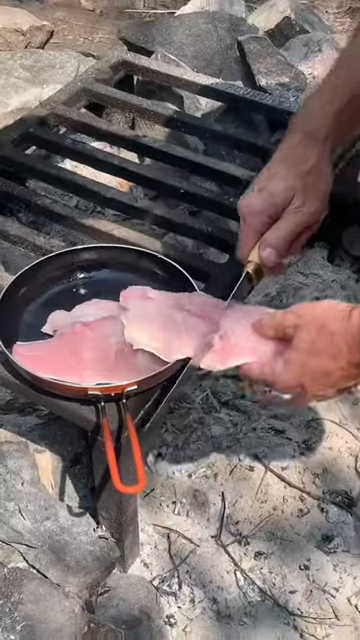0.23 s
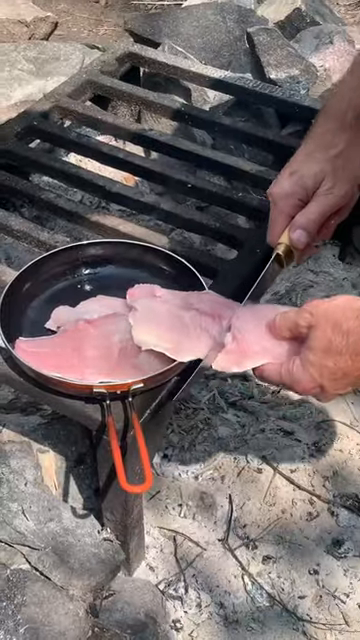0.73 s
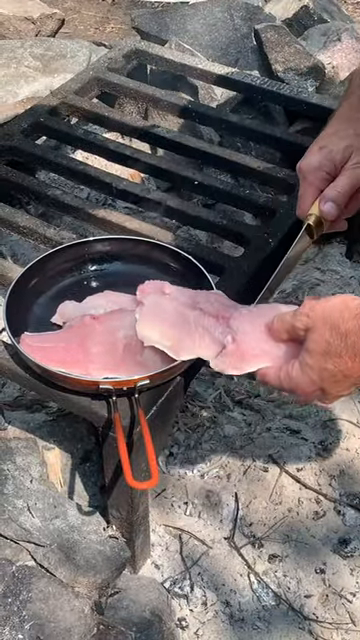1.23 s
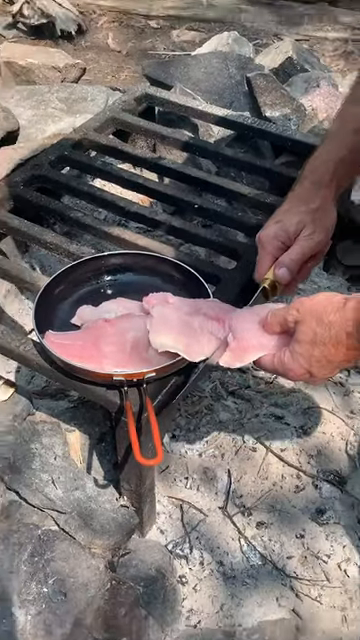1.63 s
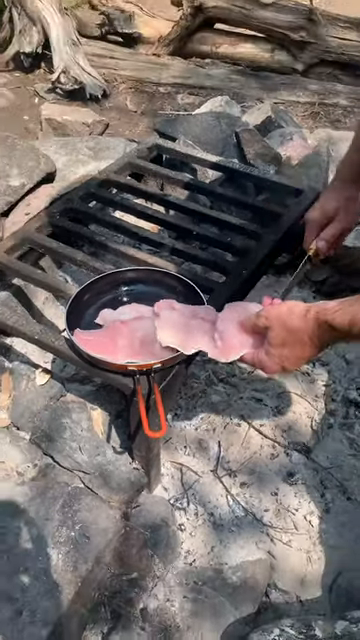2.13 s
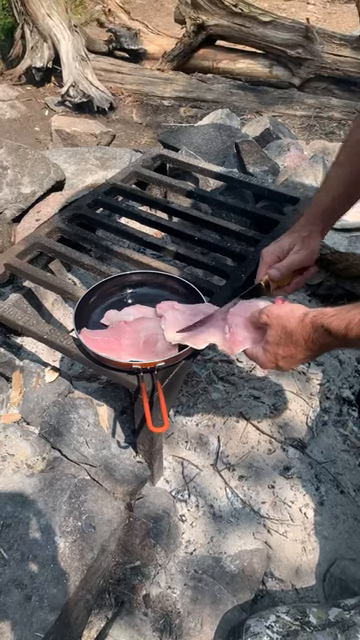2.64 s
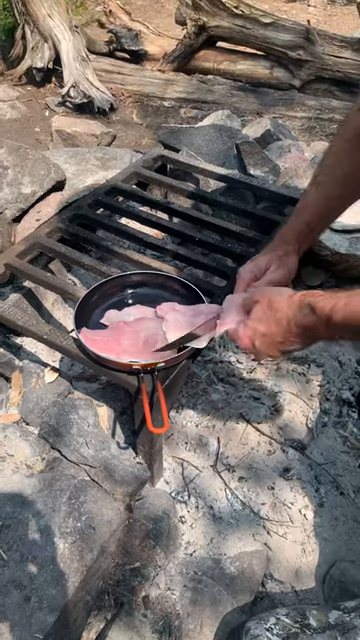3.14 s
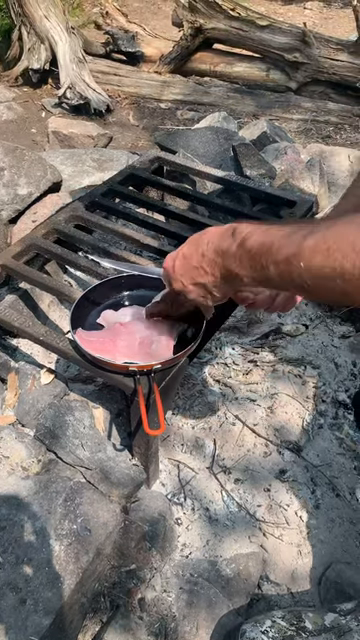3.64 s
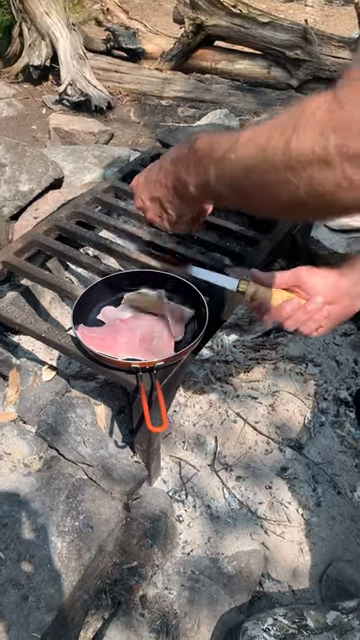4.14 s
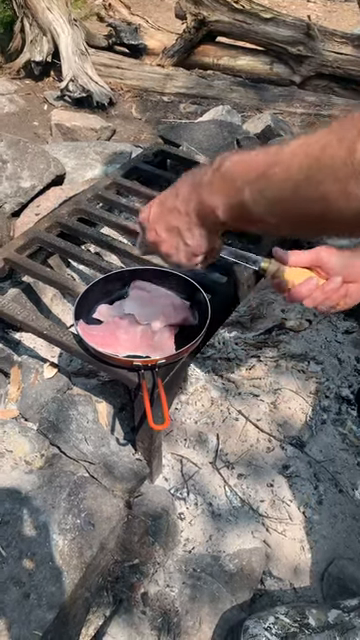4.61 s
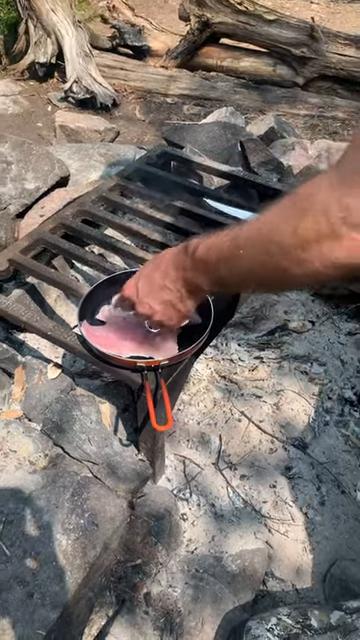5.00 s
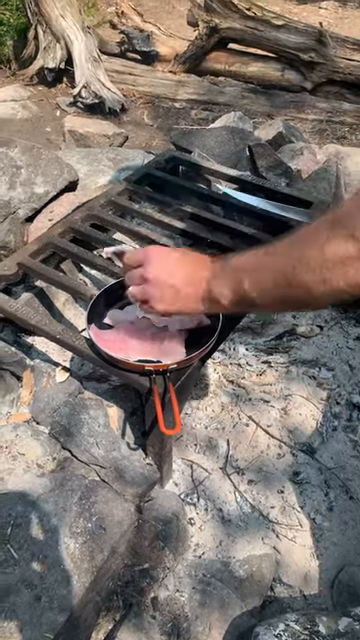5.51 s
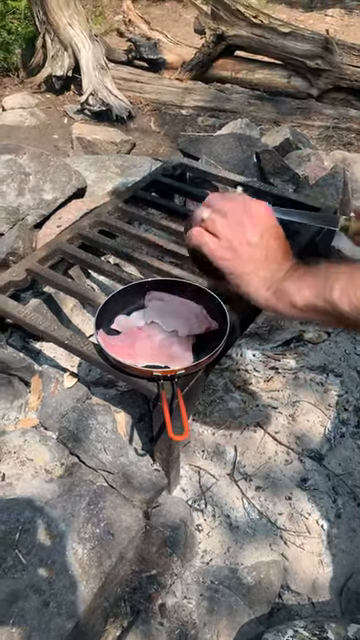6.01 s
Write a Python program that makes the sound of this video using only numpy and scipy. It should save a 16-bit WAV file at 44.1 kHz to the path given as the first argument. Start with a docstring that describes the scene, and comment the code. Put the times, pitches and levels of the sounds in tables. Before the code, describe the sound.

Outdoors, a frying pan knocks and briefly rings against a grate while a knife ticks and birds trill in a light breeze.

```python
"""Frying pan at a lakeside camp

A moment of lapping water gives way to a campsite, where fish is cut and laid in a pan on a steel grate.
Impacts excite the damped modes of pan, grate and knife; wet flesh smacks in short bursts of noise.
Small birds whistle in reverberant trees over a breeze and a fine hiss. Puffs of air buffet a
hand-held phone, whose two channels differ mainly by a phase that grows with frequency."""
import sys
import numpy as np
from scipy import signal
from scipy.fft import rfft, irfft, next_fast_len
from scipy.io import wavfile
from scipy.ndimage import uniform_filter1d, map_coordinates

SR = 44100
rng = np.random.default_rng(int(sys.argv[2]) if len(sys.argv) > 2 else 0)


def inscribe(sig):
    """Save sig as 16-bit PCM at rate SR to the path in sys.argv[1].

    A 1-D sig is mono; a 2-D sig holds one channel per row.
    Samples are clipped to [-1, 1] before scaling.
    """
    pcm = np.round(np.clip(np.atleast_2d(sig).T, -1, 1) * 32767)
    wavfile.write(sys.argv[1], SR, pcm.astype(np.int16))


N = 276066
SIDES = np.array([[1], [-1]])  # signs of the left and right channel
# reverberation among the trees: frequency_hz, t60_s
FOREST_DECAY = [(200, 0.22), (1500, 0.096), (5000, 0.36), (12000, 0.42)]


def pan():
    """Impact excites normal modes: the pan clunks on the bars, the grate thuds, the metal rings on."""
    # contacts, mostly two feet in turn:
    # start_s, level_db, hardness_db_per_octave, grate_weight_db, crack_db, left_minus_right_db
    knocks = [(1.339, -39, 6, -3, -51, 0), (1.3457, -13.5, 2.5, -7, -25, 1),
              (1.3505, -13, 0.5, -4, -26, -3), (1.3765, -30, -6, 7, -53, -4),
              (1.6363, -18.5, -5.5, -7, -43, -2.5), (1.6683, -33, -8, -5, -62, -4),
              (2.1448, -18, 3, -5, -33.5, -4.5), (2.1492, -12, 2, -4, -23, 1),
              (2.1545, -19.5, 1, -2, -39, -4), (4.1938, -20, 5, -6.5, -31, -5),
              (4.1979, -15.5, 1, -5.5, -21, 3), (4.2005, -17.5, -1.5, -2, -44, -8.5),
              (4.2145, -35.5, 8.5, -2, -46.5, -2)]
    # free vibration after a knock:
    # start_s, thud_db, ring_db, brightness_db_per_octave, sustain_ratio, twin_db, hum_db
    ringing = [(1.351, -30, -32, -7, 1.14, 5, -58.5), (1.644, -30, -42, -11, 0.57, 3, -102),
               (2.150, -33, -29.5, -1, 1.04, -6, -52), (4.199, -36, -33, 3.5, 1.3, -2, -57),
               (4.356, -71, -56.5, 9, 1.06, -10, -70)]
    # soft pushes on the pan: start_s, level_db
    nudges = [(0.498, -40.5), (1.984, -40), (2.939, -46.5)]
    # modes of pan and grate in contact, of the bowl, of the grate on stones: pitch_hz, level_db, t60_s
    contact_modes = [(212, -27, 0.083), (319, -16, 0.049), (553, -15, 0.07), (742, 0.5, 0.034),
                     (882, -4.5, 0.016), (1027, -2, 0.014), (1180, -16, 0.041), (1464, -14, 0.043),
                     (1781, -14.5, 0.051), (2534, -14, 0.012), (3180, -24.5, 0.021)]
    bowl_modes = [(447, -14.5, 0.2), (552, -15.5, 0.36), (614, -18, 0.27), (771, 2, 0.21),
                  (1243, -6.5, 0.28), (1420, -4.5, 0.11), (1553, -9.5, 0.26), (1595, -14, 0.33),
                  (1940, -12.5, 0.15), (2600, -23.5, 0.11), (3110, -20.5, 0.07)]
    grate_modes = [(208.9, -1, 0.14), (311, -5.5, 0.078), (515, -3.5, 0.094), (735, -1.5, 0.084),
                   (1000, -10.5, 0.052)]
    # crack of steel on steel: frequency_hz, level_db
    crack_spectrum = [(200, -6), (1000, 9), (1800, -5.5), (2600, 1.5), (3600, -3.5), (4600, 0.5),
                      (5800, -3.5), (7200, -12), (9200, -2.5), (11000, -12.5), (13500, -21.5),
                      (16000, -46.5)]
    # reverberation from the ground: frequency_hz, t60_s
    ground_decay = [(200, 0.4), (800, 0.2), (3000, 0.2), (12000, 0.26)]
    grate_below_hz, radiates_above_hz = 620, 200  # the small pan hardly moves the air in the bass
    twin_hz, twin_t60 = 804, 0.19  # the bowl is not quite round: its main mode beats with a twin
    hum_hz, hum_t60 = 614, 2.97  # the grate's longest mode
    chatter_db, chatters_per_s, settle_s = 4.5, 240, 0.16
    blows, vibration = np.zeros((2, N)), np.zeros(N)
    t, hum_t = clock(0.8), clock(2.5)
    for s, knock_db, hardness, weight_db, crack_db, lean_db in knocks:
        modes = tilted(contact_modes, hardness, pivot_hz=750)
        modes = [(hz, db + weight_db * (hz < grate_below_hz), t60) for hz, db, t60 in modes]
        clunk = amp(knock_db) * highpass(ring(modes, t, attack_s=0.00052), radiates_above_hz)
        envelope = burst(t, t60=0.022, fizz_db=-13, fizz_t60=0.1)
        crack = amp(crack_db) * noise(crack_spectrum, len(t)) * envelope
        add(blows, s, amp(SIDES * lean_db / 2) * (clunk + crack))
    for s, thud_db, ring_db, brightness, sustain, twin_db, hum_db in ringing:
        modes = tilted(bowl_modes + [(twin_hz, twin_db, twin_t60)], brightness, 790, sustain)
        chatter = amp(chatter_db * np.exp(-t / settle_s) * wobble(chatters_per_s, len(t)))
        thud = amp(thud_db) * ring(grate_modes, t, attack_s=0.002)
        bowl = amp(ring_db) * ring(modes, t, attack_s=0.00077)
        hum = amp(hum_db - 60 * hum_t / hum_t60) * np.sin(2 * np.pi * hum_hz * hum_t)
        add(vibration, s, chatter * (thud + bowl))
        add(vibration, s, hum)
    for s, db in nudges:
        chatter = amp(chatter_db * wobble(chatters_per_s, len(t)))
        add(vibration, s, amp(db) * chatter * ring(grate_modes, t, attack_s=0.002))
    reverb = [echoes(blows.mean(axis=0) + vibration, ground_decay, onset_s=0.02) for _ in SIDES]
    return blows + vibration + amp(-19) * wide(*reverb)


def knife():
    """A brief contact has a broad spectrum: the blade grazes the steel, clicks and rings briefly."""
    # clicks on pan and bars: start_s, level_db, peak_hz, slope_db_per_octave, t60_s
    clicks = [(1.6351, -40.5, 2670, 23, 0.049), (1.969, -32.5, 9000, 0, 0.008),
              (2.299, -34, 10400, 12, 0.011), (2.7772, -35, 6440, 15.5, 0.024),
              (4.1856, -4.5, 3260, 6.5, 0.0062), (4.311, -40, 14000, 2, 0.011),
              (4.3562, -20.5, 6900, 3, 0.015), (4.4795, -40, 11000, 12, 0.013),
              (4.748, -23, 13000, 5, 0.0087), (4.765, -33, 15100, 8, 0.029),
              (5.3700, -33, 15000, 3.5, 0.034), (5.4909, -31, 10400, 5.5, 0.011),
              (5.6290, -24, 8200, 7.5, 0.023)]
    # contact noise: frequency_hz, level_db
    crack_spectrum = [(200, -85), (900, -2), (2400, 2.5), (3200, -6), (4600, 5.5), (7000, 1.5), (10000, 11),
                      (13500, -4), (16000, -5)]
    # modes of the blade: pitch_hz, level_db, t60_s
    blade_modes = [(1250, -17.5, 0.057), (2540, -17, 0.03), (4230, -6.5, 0.011)]
    graze_s, graze_db = 0.0041, -15  # the edge grazes just before it bites
    out, t = np.zeros(N), clock(0.2)
    for s, db, peak_hz, slope, t60 in clicks:
        envelope = burst(t, t60, fizz_db=-22.5, fizz_t60=0.059)
        crack = noise(crack_spectrum, len(t), peak_hz, slope) * envelope
        graze = noise(crack_spectrum, len(t), peak_hz, slope)[:round(graze_s * SR)]
        blade = ring(tilted(blade_modes, slope, peak_hz), t, attack_s=0.00053)
        add(out, s, amp(db) * (crack + blade))
        add(out, s - graze_s, amp(db + graze_db) * graze * np.linspace(0, 1, len(graze)))
    return out + amp(-21) * echoes(out, FOREST_DECAY, onset_s=0.0031)


def scrape():
    """Sliding friction makes noise as the blade drags over steel, and a squeak as it comes free."""
    # drags of the blade: start_s, length_s, level_db
    drags = [(1.954, 0.039, -46), (1.983, 0.03, -43.5)]
    # friction noise: frequency_hz, level_db
    friction_spectrum = [(800, -2), (1600, -6), (2450, 3), (4800, 5), (8000, -7), (10400, 8), (13000, -11),
                         (14900, 1), (16000, -15)]
    squeak_hz, squeak_db = 6150, -36.5
    out, t = np.zeros(N), np.arange(N) / SR
    for s, length_s, db in drags:
        size = int(length_s * SR)
        add(out, s, amp(db) * noise(friction_spectrum, size) * signal.windows.tukey(size, 0.25))
    squeak = np.sin(2 * np.pi * squeak_hz * t + wobble(500))
    out += amp(squeak_db) * swell(t, peak_s=2.005, width_s=0.0045) * squeak
    return out + amp(-16.5) * echoes(out, FOREST_DECAY, onset_s=0.003)


def fish():
    """Wet flesh peels free in grainy noise bursts; resonating air pockets give some a pitch."""
    # smacks of fish and hands: start_s, level_db, decay_s
    smacks = [(1.804, -41.5, 0.0039), (2.727, -42, .003), (3.167, -43.5, .004), (3.911, -42, 0.0044),
              (3.924, -56, 0.17), (4.171, -33, 0.011), (5.865, -41, 0.0047), (6.058, -38.5, 0.0067)]
    # wet noise: frequency_hz, level_db
    wet_spectrum = [(200, -24), (900, -16), (2000, -10), (5000, -4.5), (7500, -2.5), (10000, 7.5),
                    (13500, -10.5), (16000, -7)]
    # air pockets under the fillet: start_s, level_db, pitch_hz, decay_s
    squelches = [(1.314, -47, 5460, 0.011), (3.932, -42, 2880, 0.0044), (3.949, -57, 3550, 0.11),
                 (4.011, -45.5, 6200, 0.012)]
    handling_s, faint_range_db, faint_decay_s = (1.4, 5.4), (-58, -41), 0.0031
    faint_smacks = [(rng.uniform(*handling_s), rng.uniform(*faint_range_db), faint_decay_s)
                    for _ in range(7)]
    out, t = np.zeros(N), clock(0.25)
    for s, db, decay_s in smacks + faint_smacks:
        grains = noise(wet_spectrum, len(t)) * amp(3.2 * wobble(900, len(t)))
        add(out, s, amp(db) * flick(t, decay_s) * unit(grains))
    for s, db, hz, decay_s in squelches:
        pocket = wobble(1200, len(t)) * np.sin(2 * np.pi * hz * t)
        add(out, s, amp(db) * flick(t, decay_s) * unit(pocket))
    return out


def birds():
    """Frequency-modulated whistles arrive by three paths: direct, scattered by leaves, off the trees."""
    # contour of each syllable: time_s, pitch_hz, level_db
    contours = { "hook": [(0, 6350, -12), (.015, 6250, 2), (.026, 5200, 3), (.036, 4250, 3),
                (.044, 4500, -6), (.054, 5550, 1), (.07, 4950, 6), (.092, 4750, 3)],
                "zigzag": [(0, 4700, 4), (.019, 3680, 0), (.03, 3550, -8), (.047, 5600, 1), (.06, 4250, 2),
                (.082, 3500, -7)], "slur": [(0, 7500, -7), (.02, 7080, -4), (.045, 6750, -6),
                (.07, 6520, 0), (.085, 6000, -1), (.1, 5350, -4), (.112, 4950, -10)],
                "rise": [(0, 7280, -5), (.04, 7450, -1), (.08, 7560, -2), (.1, 7990, 0), (.135, 8040, 0),
                (.168, 8230, -1), (.18, 8400, -14)], "flourish": [(0, 4550, 3), (.02, 4650, 4),
                (.042, 5450, 5), (.054, 6100, 4), (.068, 7000, 0), (.087, 4400, -3), (.108, 3450, -9)],
                "dip": [(0, 6090, -8), (.06, 5100, -6), (.09, 4500, 0), (.12, 4070, 0)],
                "scoop": [(0, 4650, -4), (.033, 3980, 2), (.055, 3750, -10), (.08, 4250, 4),
                (.11, 5480, 5)]}
    # tremble of each syllable: depth_fraction_of_pitch
    rasp = {"hook": .03, "zigzag": .035, "slur": .014, "rise": .008, "flourish": .025, "dip": .022, "scoop":
            .022}
    # single notes that close or link trills: syllable, start_s, level_db, pitch_ratio
    notes = [("rise", 3.38, -35.5, 0.99), ("flourish", 3.56, -40.5, 0.97), ("dip", 5.585, -48, 0.9)]
    # screening of the far bird's direct path, by syllable: gain_db
    screening = {"dip": -8, "scoop": -8}
    # scattering in the foliage: frequency_hz, t60_s
    leaf_decay = [(1000, .07), (10000, .07)]
    out = np.zeros(N)
    for name, s, db, pitch_ratio in trills() + notes:
        times, hz, level_db = np.transpose(contours[name])
        t = clock(times[-1])
        envelope = amp(db + np.interp(t, times, level_db)) * signal.windows.tukey(len(t), 0.15)
        quaver = 1 + rasp[name] * wobble(700, len(t))
        phase = 2 * np.pi * np.cumsum(pitch_ratio * quaver * np.interp(t, times, hz)) / SR
        note = np.pad(envelope * np.sin(phase), (0, SR // 2))
        direct = amp(-5.5 + screening.get(name, 0)) * note
        scattered = amp(-4.5) * echoes(note, leaf_decay, onset_s=0.00039)
        reverb = amp(-3) * echoes(note, FOREST_DECAY, onset_s=0.01)
        add(out, s, direct + scattered + reverb)
    return out


def trills():
    """Vocal effort couples level and pitch: in these rows of repeated notes, softer is also lower."""
    # trills: syllable, start_s, repeats, period_s, peak_db, peak_s, width_s, pitch_ratio
    phrases = [("hook", .150, 5, .127, -37.5, 0.57, 0.47, 1),
               ("zigzag", .785, 3, .103, -39.5, 0.64, .33, 0.99),
               ("slur", 2.634, 5, .150, -32.5, 3.23, 0.4, 1.004),
               ("dip", 5.02, 4, 0.16, -48.5, 5.55, 0.5, 0.99),
               ("scoop", 5.8, 2, .15, -47.5, 5.82, 0.37, 0.98)]
    pitch_fraction_per_db = 0.002
    notes = []
    for name, start_s, repeats, period_s, peak_db, peak_s, width_s, pitch_ratio in phrases:
        for s in start_s + period_s * np.arange(repeats):
            effort_db = 20 * np.log10(swell(s, peak_s, width_s))
            sag = 1 + pitch_fraction_per_db * effort_db
            notes.append((name, s, peak_db + effort_db, pitch_ratio * sag))
    return notes


def wind():
    """Turbulent pressure rumbles with each gust; a sharp puff rocks the diaphragm for a few cycles."""
    # gusts on the phone: peak_s, level_db, width_s
    gusts = [(0.614, -56, 0.084), (1.185, -49.5, 0.039), (1.406, -45.5, 0.15), (2.017, -49.5, 0.074),
             (3.128, -54.5, 0.074), (4.687, -56, 0.017), (4.935, -53.5, 0.076), (5.242, -48.5, 0.058),
             (5.606, -63, 0.12)]
    # puffs of air: peak_s, level_db, pitch_hz, width_s
    puffs = [(1.287, -26.5, 58, 0.011), (1.621, -39, 70, 0.013), (1.914, -31.5, 69, 0.012),
             (1.997, -35.5, 54, 0.023), (3.209, -30, 66, 0.0081), (3.424, -28.5, 61, 0.015),
             (3.463, -34.5, 58, 0.022), (4.183, -36, 55, 0.025), (5.293, -38.5, 55, 0.012),
             (6.153, -23.5, 60, 0.01), (6.256, -21.5, 93, 0.015)]
    # buffeting: frequency_hz, level_db
    buffet_spectrum = [(15, -18.5), (35, -3), (58, 2), (95, -10.5), (150, -25), (400, -43.5), (3000, -89.5)]
    calm_db, skew_rad = -68.5, 0.11  # a puff reaches the two ports slightly out of step
    t = np.arange(N) / SR
    strength = amp(calm_db) + sum(amp(db) * swell(t, s, width_s) for s, db, width_s in gusts)
    bumps = sum(amp(db) * swell(t, s, width_s) * np.cos(2 * np.pi * hz * (t - s) - SIDES * skew_rad)
                for s, db, hz, width_s in puffs)
    eddies = amp(4.5 * wobble(11))
    rumble = noise(buffet_spectrum, N) + amp(-21) * SIDES * noise(buffet_spectrum, N)
    return bumps + strength * eddies * rumble


def air():
    """Diffuse noise from all round: a far breeze easing in the trees, and a fine, grainy hiss."""
    # steady spectra: frequency_hz, level_db
    breeze_spectrum = [(60, 3.5), (150, 0.5), (300, -0.5), (550, -2.5), (900, -12), (1600, -14.5),
                       (4000, -29)]
    hiss_spectrum = [(500, -2), (1500, -10.5), (3200, -5), (4900, 0.5), (6200, -4.5), (7800, -2),
                     (9200, -2.5), (10400, 8.5), (11300, -7.5), (12200, -2.5), (13300, -11.5),
                     (15500, -9.5), (16200, -28.5)]
    breeze_db, easing_db_per_s, hiss_db = -58.5, 1, -57.5
    t = np.arange(N) / SR
    breeze = wide(patchy(noise(breeze_spectrum, N), depth_db=4), noise(breeze_spectrum, N))
    hiss = wide(patchy(noise(hiss_spectrum, N), depth_db=2.5), noise(hiss_spectrum, N))
    grain = amp(0.89 * wobble(150) + 1.5 * wobble(12))
    easing = amp(breeze_db - easing_db_per_s * t + 0.48 * wobble(8))
    return easing * breeze + amp(hiss_db) * grain * hiss


def lake():
    """Wind-driven ripples lap the shore as fluttering noise; bubbles ring as damped resonators."""
    # water and wind: frequency_hz, level_db
    shore_spectrum = [(25, 11), (70, 12), (150, 2.5), (400, -7), (1000, -13.5), (1800, -14), (3000, -14),
                      (4500, -17.5), (9000, -40), (16000, -42)]
    # bubbles at the shore: start_s, level_db, pitch_hz
    bubbles = [(.003, -38.5, 1120), (0.026, -43.5, 1217), (0.06, -39.5, 463), (0.074, -39.5, 2800),
               (.085, -35, 830)]
    bubble_t60 = 0.035
    out = amp(-44 + 2.5 * wobble(70)) * noise(shore_spectrum, N)
    for s, db, hz in bubbles:
        add(out, s, amp(db) * ring([(hz, 0, bubble_t60)], clock(0.1), attack_s=0.00056))
    return out


def ring(modes, t, attack_s):
    """Superposition of damped modes, struck with new random strengths each time."""
    hz, db, t60 = np.transpose(modes)[:, :, None]
    level_db = db + rng.standard_normal(db.shape) - 60 * t / t60
    return np.sum(amp(level_db) * np.sin(2 * np.pi * hz * t), axis=0) * (1 - np.exp(-t / attack_s))


def tilted(modes, db_per_octave, pivot_hz, sustain=1):
    """Spectral tilt: harder contacts excite higher modes. A looser seat lets them ring longer."""
    return [(hz, db + db_per_octave * np.log2(hz / pivot_hz), t60 * sustain) for hz, db, t60 in modes]


def burst(t, t60, fizz_db, fizz_t60):
    """Two-stage decay of a hard contact: an instant crack and a short fizz of dense high modes."""
    return amp(-60 * t / t60) + amp(fizz_db - 60 * t / fizz_t60)


def flick(t, decay_s):
    """Envelope of a wet release: sudden rise, exponential decay."""
    return np.exp(-t / decay_s) * (1 - np.exp(-t / 0.0005))


def swell(t, peak_s, width_s):
    """Gaussian envelope: 1 at its peak, 1/e at width_s to either side."""
    return np.exp(-((t - peak_s) / width_s) ** 2)


def echoes(x, decay, onset_s):
    """Diffuse reverberation: convolution with noise in which each frequency dies at its own rate."""
    hz, t, spectra = signal.stft(rng.standard_normal(SR * 3 // 4), SR, nperseg=256)
    tail = signal.istft(spectra * amp(-60 * t / along(decay, hz)[:, None]), SR, nperseg=256)[1]
    tail *= 1 - np.exp(-(np.arange(len(tail)) / SR / onset_s) ** 2)
    return signal.fftconvolve(x, tail / np.linalg.norm(tail))[:len(x)]


def wide(mid, side):
    """Decorrelation: an unrelated side signal makes the channels differ, mostly in the midrange."""
    # response of the side signal: frequency_hz, gain_db
    side_gain = [(90, -24), (260, -7.5), (900, 1.5), (2000, -5), (3500, -28)]
    return mid + SIDES * filtered(side, lambda hz: amp(along(side_gain, hz)))


def patchy(x, depth_db):
    """Random modulation: small patches of time and frequency grow and shrink."""
    spectra = signal.stft(x, nperseg=512)[2]
    field = uniform_filter1d(rng.standard_normal(spectra.shape), size=4, axis=0)
    field = uniform_filter1d(field, size=12, axis=1)
    return unit(signal.istft(spectra * amp(depth_db * unit(field)), nperseg=512)[1][:N])


def noise(spectrum, size, peak_hz=1000, db_per_octave=0):
    """Coloured noise of rms 1, with an optional extra fall on both sides of a peak."""
    def gain(hz):
        return amp(along(spectrum, hz) - db_per_octave * np.abs(np.log2((hz + 1) / peak_hz)))
    return unit(filtered(rng.standard_normal(size), gain))


def wobble(knots_per_s, size=N):
    """A smooth curve through random knots."""
    knots = rng.standard_normal(int(size * knots_per_s / SR) + 4)
    return map_coordinates(knots, [np.arange(size) * knots_per_s / SR])


def filtered(x, response):
    """Linear filtering: the spectrum of x times a complex frequency response."""
    size = x.shape[-1]
    padded = next_fast_len(size + 8192)
    return irfft(rfft(x, padded) * response(np.fft.rfftfreq(padded, 1 / SR)), padded)[..., :size]


def highpass(x, hz):
    """Second-order roll-off below hz."""
    return signal.sosfilt(signal.butter(2, hz, "highpass", fs=SR, output="sos"), x)


def along(points, hz):
    """Interpolate (frequency_hz, value) points on a log frequency axis."""
    frequencies, values = np.transpose(points)
    return np.interp(np.log(hz + 1), np.log(frequencies + 1), values)


def add(track, start_s, sound):
    """Superpose a sound on the track."""
    start = max(0, round(start_s * SR))
    part = track[..., start:start + sound.shape[-1]]
    part += sound[..., :part.shape[-1]]


def amp(db):
    return 10 ** (np.asarray(db) / 20)


def unit(x):
    return x / np.sqrt(np.mean(x ** 2) + 1e-20)


def clock(seconds):
    return np.arange(int(seconds * SR)) / SR


def scene():
    """The shore gives way abruptly to the camp; the left channel's phase lead grows toward the treble."""
    # phase of left ahead of right: frequency_hz, lead_turns
    phase_lead = [(0, 0), (1100, -.02), (2500, .21), (3200, .2), (3900, .3), (4700, .5), (6200, .86),
                  (7200, 1), (8400, 1.47), (9100, 1.51), (10000, 1.77), (10900, 2), (11500, 2),
                  (12700, 2.48), (13400, 2.52), (14700, 3)]
    lake_end_s, fade_out_s, fade_in_s = 0.1083, 0.016, 0.092
    t = np.arange(N) / SR
    shore = np.clip((lake_end_s - t) / fade_out_s, 0, 1)
    camp = np.clip((t - lake_end_s) / fade_in_s, 0, 1)
    sound = shore * lake() + camp * (pan() + knife() + scrape() + fish() + birds() + wind() + air())
    lead_hz, lead_turns = np.transpose(phase_lead)
    return filtered(sound, lambda hz: np.exp(1j * np.pi * SIDES * np.interp(hz, lead_hz, lead_turns)))


def record(dry):
    """Band limiting: the phone sheds the deepest bass, clips at full scale and cuts the top treble."""
    bottom_hz, top_hz = 29, 16400
    clipped = np.clip(highpass(dry, bottom_hz), -1, 1)
    return filtered(clipped, lambda hz: hz < top_hz)


dry = scene()
out = record(dry)
inscribe(out)
```